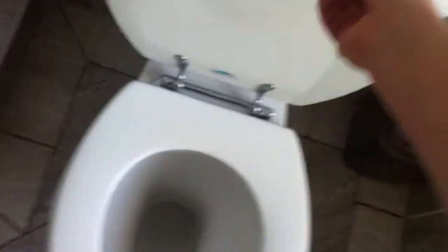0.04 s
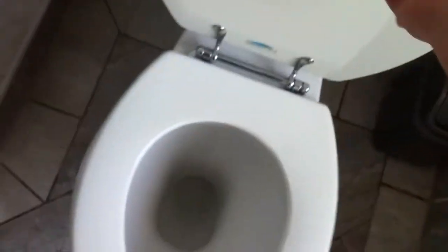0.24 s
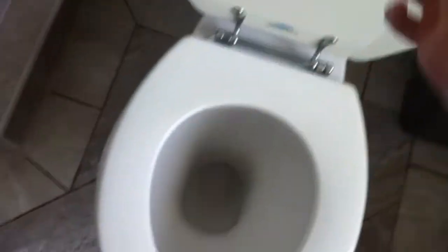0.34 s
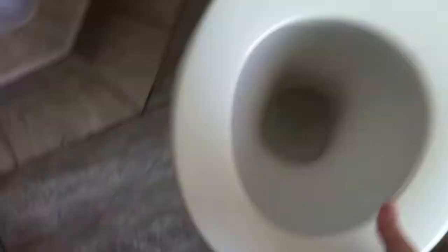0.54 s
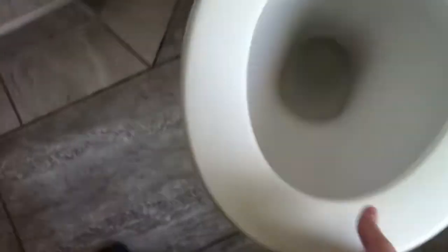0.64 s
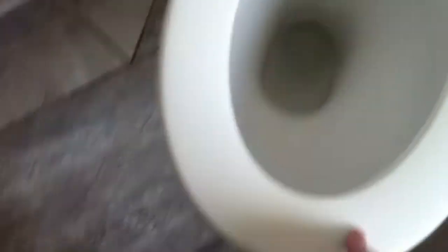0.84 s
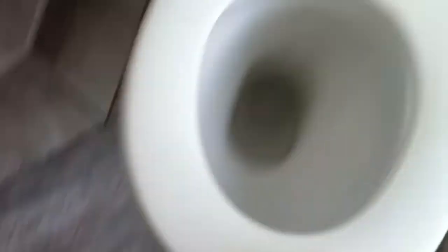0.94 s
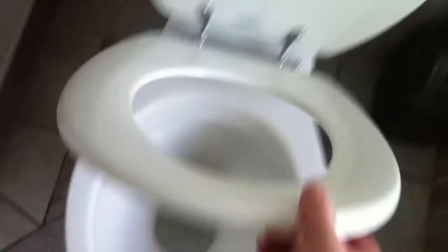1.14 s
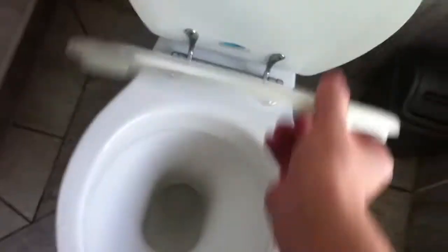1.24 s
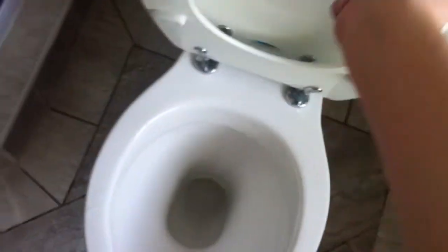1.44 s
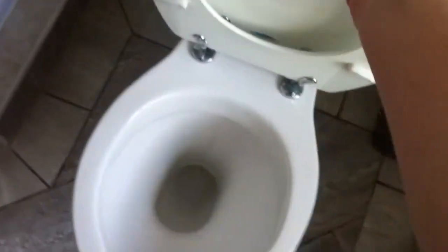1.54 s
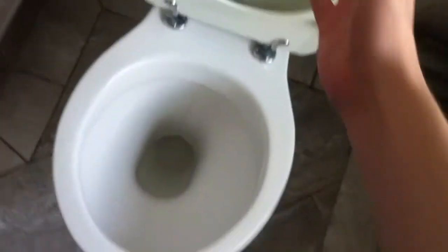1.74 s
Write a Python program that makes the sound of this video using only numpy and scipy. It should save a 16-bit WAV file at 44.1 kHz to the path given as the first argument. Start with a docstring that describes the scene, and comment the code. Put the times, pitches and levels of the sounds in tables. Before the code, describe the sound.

Loud hollow clack of a toilet lid hitting its tank, then very faint seat handling

```python
"""Toilet lid and seat in a tiled bathroom

A toilet lid swings up and knocks hard against the tank, close to the microphone: noise bursts and damped modes.
A hand then lifts the seat: clicks of decaying noise, bumps of low modes, and shaped noise for rustling cloth.
The hinges rub as noise through resonances, the room answers the knock with decaying reflections,
a faint treble hiss swells three times, and under it all lie steady air noise and a wavering sine, the room's hum."""
import sys
import numpy as np
from scipy import signal
from scipy.fft import rfft, irfft, next_fast_len
from scipy.io import wavfile
from scipy.ndimage import map_coordinates

SR = 44100
rng = np.random.default_rng(int(sys.argv[2]) if len(sys.argv) > 2 else 0)


def wav_out(sig):
    """Save sig, one row per channel (or a flat mono array), as 16-bit PCM at SR to the path in sys.argv[1]."""
    wavfile.write(sys.argv[1], SR, np.round(np.clip(np.atleast_2d(sig).T, -1, 1) * 32767).astype(np.int16))


N = 79380
T = np.arange(N) / SR  # time in seconds
TOP_HZ = 15850  # upper band limit


def amp(db):
    """Level to amplitude: 20 dB is a factor of ten."""
    return 10 ** (np.asarray(db) / 20)


def unit(x):
    """Normalisation: scale a signal to an rms of 1."""
    return x / np.sqrt(np.mean(x ** 2) + 1e-20)


def along(points, hz):
    """Logarithmic frequency scale: interpolate (Hz, value) points along it."""
    f, v = np.transpose(points)
    return np.interp(np.log(hz + 1), np.log(f + 1), v)


def level(points):
    """Level envelope: interpolate (s, dB) points in decibels and return the gain per sample."""
    return amp(np.interp(T, *np.transpose(points)))


def fade(t60, t=T):
    """Exponential decay: the amplitude falls by 60 dB in t60 seconds."""
    return np.exp(-np.log(1000) * t / t60)


def wobble(rate):
    """Random modulation: a smooth curve through random knots, rate knots a second."""
    knots = rng.standard_normal(256)
    return map_coordinates(knots, [T * rate], mode="wrap")


def filtered(x, response):
    """Linear filtering: multiply the spectrum by a frequency response."""
    m = next_fast_len(N + SR // 2)
    hz = np.fft.rfftfreq(m, 1 / SR)
    return irfft(rfft(x, m) * response(hz), m)[:N]


def butter(x, hz, kind, order):
    """Causal filtering: a Butterworth low-pass or high-pass."""
    sos = signal.butter(order, min(hz, TOP_HZ), kind, fs=SR, output="sos")
    return signal.sosfilt(sos, x)


def noise(spectrum):
    """Spectral shaping: white noise coloured by (Hz, dB) points, of rms 1."""
    white = rng.standard_normal(N)
    return unit(filtered(white, lambda hz: amp(along(spectrum, hz))))


def at(s, x):
    """Delay: start the signal x at time s."""
    return np.pad(x, (max(round(s * SR), 0), 0))[:N]


def ring(modes, attack_s):
    """Modal superposition: damped sines whose levels and phases vary at random."""
    total = np.zeros(N)
    for hz, db, t60 in modes:
        gain = amp(db + rng.normal(0, .5))
        rise_s = max(attack_s, 1 / hz)  # build-up time constant of at least one cycle
        build_up = 1 - np.exp(-(T / rise_s) ** 2)
        sine = np.sin(2 * np.pi * (hz * T + rng.random()))
        total += gain * fade(t60) * build_up * sine
    return total


# What the lid and tank ring with. Each row: frequency in Hz, relative level in dB, t60 in s.
LID_MODES = [(164, -19, 0.77), (230.6, -9, 0.24), (280, -15, .35), (392, -15, 0.099), (568.2, -17, 0.45),
             (760, -15, 0.16), (851, -14.5, 0.38), (904, -9, 0.34), (959, -5, 0.13), (1111.5, -10.5, 0.28),
             (1097, 1, 0.098), (1310, -7, .12), (1337, -7.5, 0.15), (1433, -9.5, 0.078), (1563, -17, .16),
             (1563, -23, .29), (1632, -8.5, 0.33), (1689, -19.5, .16), (1806, -14, 0.61), (1940, -12, 0.27),
             (2140, -17.5, .3), (2340, -18, 0.07), (2501, -14.5, .22), (2837, -22.5, 0.2), (3090, -27, 0.1),
             (3317, -19.5, 0.068)]
# The first hard contact. Each row: frequency in Hz, relative density in dB per Hz.
CRACK_SPECTRUM = [(300, -18.5), (800, -13.5), (1400, 1), (2200, -1), (3400, -13.5), (3900, -10),
                  (6500, -26), (8200, -30), (9500, -37), (15500, -46)]
# The dense, quickly damped clack. Each row: frequency in Hz, relative density in dB per Hz.
CLACK_SPECTRUM = [(40, -17.5), (105, -27), (150, -1), (450, -1), (700, -7.5), (1150, 3.5), (1800, 3),
                  (2700, -4), (3400, -7.5), (3750, -24), (8000, -33), (10000, -44.5), (15500, -48.5)]
# The room's answer to the blow. Each row: frequency in Hz, relative density in dB per Hz.
ECHO_SPECTRUM = [(40, -17.5), (75, -32.5), (112, -28.5), (142, -1.5), (400, -1.5), (540, -6), (680, 0.5),
                 (810, -6.5), (920, 1.5), (1300, -1), (1470, -4), (1800, 0.5), (2050, -5.5), (2480, -5.5),
                 (2700, -12), (3200, -16.5), (3900, -28.5), (5500, -30), (8500, -39.5), (11000, -53),
                 (15500, -56)]
# Standing waves between the tiled walls. Each row: frequency in Hz, relative level in dB, t60 in s.
ROOM_MODES = [(181, -23, 1.05), (218, -32, 1.1), (320, -24, .72), (349, -28, .7), (419, -26, .65),
              (437, -25, .55), (673, -28, .88), (909, -24, .58), (978, -24, .58), (1252, -24, .6),
              (1793, -25, .58)]
KNOCK_S, KNOCK_DB = .2076, -12
CRACK_DB, CRACK_T60_S = -3.5, 0.011
CLACK_DB, CLACK_T60_S, CONTACT_RISE_S = 4.5, 0.039, .0006
RING_DB, RING_ATTACK_S = -2, .0008
ECHO_DB, STANDING_RISE_S = -8.5, 0.013


def lid_knock():
    """Impact excitation: brief broadband contact noise, the modes of lid and tank, and the room."""
    crack = amp(CRACK_DB) * noise(CRACK_SPECTRUM) * fade(CRACK_T60_S)
    clack = amp(CLACK_DB) * noise(CLACK_SPECTRUM) * fade(CLACK_T60_S)
    contact = (crack + clack) * (1 - np.exp(-T / CONTACT_RISE_S))
    body = amp(RING_DB) * ring(LID_MODES, RING_ATTACK_S)
    echo_source = unit(filtered(noise(ECHO_SPECTRUM), lid_colour))
    reflections = amp(ECHO_DB) * room_tail(echo_source)
    standing_waves = ring(ROOM_MODES, STANDING_RISE_S)
    return at(KNOCK_S, amp(KNOCK_DB) * (contact + body + reflections + standing_waves))


ECHO_PEAK_DB, ECHO_PEAK_WIDTH_HZ = 4.5, 26.7


def lid_colour(f):
    """Resonant colouring: the response peaks at each mode of lid and tank."""
    peaks = [1 / (1 + (2 * (f - hz) / ECHO_PEAK_WIDTH_HZ) ** 2) for hz, _, _ in LID_MODES]
    return amp(ECHO_PEAK_DB * np.max(peaks, axis=0))


# Decay of the tiled room. Each row: frequency in Hz, t60 in s.
ROOM_DECAY = [(80, 1.3), (190, 0.55), (350, 0.91), (700, 0.72), (1500, 0.67), (2800, 0.61), (6000, 0.47),
              (12000, 0.37)]
ECHO_RISE_S = 0.0052  # time constant


def room_tail(source):
    """Diffuse reverberation: dense reflections, in which each frequency decays at its own rate."""
    hz, t, z = signal.stft(source, SR, nperseg=1024)
    decay = fade(along(ROOM_DECAY, hz)[:, None], t)
    tail = signal.istft(z * decay, SR, nperseg=1024)[1][:N]
    return tail * (1 - np.exp(-T / ECHO_RISE_S))


# The blow pushes tank and wall. Each row: frequency in Hz, relative level in dB, t60 in s.
PUSH_MODES = [(42, -35.5, .18)]


def low_push():
    """Heavy damping: one low mode of tank and wall, shoved by the knock."""
    return at(KNOCK_S, amp(KNOCK_DB) * ring(PUSH_MODES, RING_ATTACK_S))


# Contacts of hand, seat and hinge. Each row: start in s, level in dB, low-pass cutoff in Hz.
CLICKS = [(.9095, -50, 11500), (.925, -48, 3570), (.941, -54.5, 2600), (1.608, -52, 2890),
          (1.624, -55.5, 2070), (1.756, -64, 2840), (1.768, -50.5, 3720), (1.79, -57, 2700)]
# Colour of a click. Each row: frequency in Hz, relative density in dB per Hz.
CLICK_SPECTRUM = [(100, -36), (300, 1.5), (800, -1.5), (1400, 2), (2100, 4), (3300, -3.5), (4300, -9.5),
                  (8000, -17), (15000, -10)]
CLICK_T60_S, CLICK_ROOM_DB = 0.082, -11


def seat_clicks():
    """Contact stiffness: the softer the touch, the lower the cutoff of its noise burst."""
    total = np.zeros(N)
    for s, db, dull_hz in CLICKS:
        direct = noise(CLICK_SPECTRUM) * fade(CLICK_T60_S)
        reflections = amp(CLICK_ROOM_DB) * room_tail(noise(CLICK_SPECTRUM))
        click = butter(direct + reflections, dull_hz, "low", order=4)
        total += at(s, amp(db) * click)
    return total


# Soft bumps of the seat as it is lifted. Each row: start in s, level in dB.
BUMPS = [(0.928, -50.5), (.943, -51), (1.042, -55), (1.16, -56), (1.656, -71), (1.71, -61), (1.772, -57.5)]
# What the seat rings with. Each row: frequency in Hz, relative level in dB, t60 in s.
SEAT_MODES = [(207, 1, .35), (256, 0, .2), (316, -1, .2), (385, -5, .2), (712, -6, .15), (846, -3, .16),
              (932, -4, .22), (1292, -13, .22), (1795, -11, .15)]
BUMP_ATTACK_S = 0.0073


def seat_bumps():
    """Cushioned impact: a slow attack sets the seat's modes ringing."""
    return sum(at(s, amp(db) * ring(SEAT_MODES, BUMP_ATTACK_S)) for s, db in BUMPS)


# Resonances of the rubbing hinges. Each row: frequency in Hz, width in Hz, relative level in dB.
RUB_MODES = [(334, 70, 1.5), (700, 20, -13.5), (857, 18, 1.5), (923, 10, -5), (1285, 43, -2),
             (1760, 70, -2.5)]
# Strength of the rub. Each row: time in s, level in dB.
RUB_LEVEL = [(0, -72), (.16, -64.5), (.26, -88.5), (.89, -73), (.96, -72.5), (1.18, -62.5), (1.3, -70.5),
             (1.42, -67.5), (1.57, -74.5), (1.66, -63), (1.72, -64.5), (1.8, -67)]


def hinge_rub():
    """Friction excitation: uneven noise from the turning hinges, heard through resonances."""
    def resonances(f):
        return sum(amp(db) / (1 + (2 * (f - hz) / width) ** 2) for hz, width, db in RUB_MODES)

    friction = rng.standard_normal(N) * amp(1.2 * wobble(45))
    return level(RUB_LEVEL) * unit(filtered(friction, resonances))


# Clothing as the arm moves. Each row: time in s, level in dB.
RUSTLE_LEVEL = [(0, -58), (.07, -66), (.6, -74), (.76, -66), (.89, -68.5), (1.0, -70.5), (1.12, -63),
                (1.23, -57.5), (1.31, -61.5), (1.4, -68.5), (1.57, -69.5), (1.7, -80.5), (1.8, -65)]
# Colour of the cloth. Each row: frequency in Hz, relative density in dB per Hz.
RUSTLE_SPECTRUM = [(100, -30.5), (300, 0.5), (520, -6.5), (850, -6.5), (1300, -0.5), (1600, -7),
                   (2050, -0.5), (2400, -0.5), (2700, -6.5), (3200, -5), (4200, -18.5), (6500, -21),
                   (9000, -25), (15000, -30)]


def cloth_rustle():
    """Friction noise: the rustle of cloth fluctuates at random."""
    return level(RUSTLE_LEVEL) * noise(RUSTLE_SPECTRUM) * amp(1.2 * wobble(60))


# Swells of faint treble hiss. Each row: centre in s, length in s, peak level in dB.
HISS_SWELLS = [(0.085, .22, -73.5), (0.794, 0.034, -71), (1.763, 0.38, -68.5)]
# Colour of the hiss. Each row: frequency in Hz, relative density in dB per Hz.
HISS_SPECTRUM = [(500, -30.5), (4000, -3.5), (7000, -0.5), (11000, -4), (15500, -14.5)]


def treble_hiss():
    """Amplitude modulation: treble noise swells and sinks under smooth bell-shaped envelopes."""
    swells = sum(amp(db) * np.exp(-(2 * (T - s) / length) ** 2) for s, length, db in HISS_SWELLS)
    return swells * noise(HISS_SPECTRUM)


# The room's hum swells and sinks. Each row: time in s, level in dB.
HUM_LEVEL = [(0, -89), (.4, -69), (.6, -56), (.78, -64), (.88, -69), (1.0, -60), (1.13, -72), (1.21, -57),
             (1.33, -61.5), (1.4, -69), (1.44, -62.5), (1.5, -55), (1.55, -64), (1.64, -67.5), (1.68, -57),
             (1.8, -71.5)]
# Steady background. Each row: frequency in Hz, relative density in dB per Hz.
AIR_SPECTRUM = [(30, -10.5), (90, -11.5), (165, 12), (340, 2), (520, -2), (1300, -5.5), (2400, -2),
                (3200, -16.5), (4200, -12.5), (6500, -12.5), (10000, -20), (15500, -16.5)]
HUM_HZ, HUM_WIDTH_HZ, HUM_WAVER_DB = 209.4, 4, 2.9  # the last two scale random wavering
AIR_DB = -65


def background():
    """Narrow-band resonance: a sine wavering in pitch and level, over steady air noise."""
    hz = HUM_HZ + HUM_WIDTH_HZ * wobble(25)
    sine = np.sqrt(2) * np.sin(2 * np.pi * np.cumsum(hz) / SR)
    hum = level(HUM_LEVEL) * sine * amp(HUM_WAVER_DB * wobble(44))
    return amp(AIR_DB) * noise(AIR_SPECTRUM) + hum


BASS_CUT_HZ = 116  # lid and seat radiate little below this


def scene():
    """Superposition: all sources add up at one microphone."""
    blows = butter(lid_knock() + seat_clicks() + seat_bumps(), BASS_CUT_HZ, "high", order=3)
    soft_noises = hinge_rub() + cloth_rustle() + treble_hiss()
    return (blows + low_push() + soft_noises + background())[None]


def record(dry):
    """Band limiting: the recorder keeps almost nothing above its upper limit."""
    return filtered(dry[0], lambda hz: 1 / (1 + (hz / TOP_HZ) ** 200))[None]


dry = scene()
out = record(dry)
wav_out(out)
```